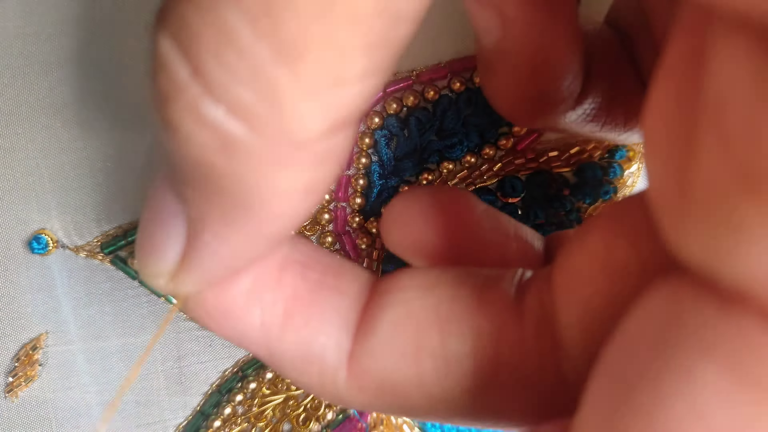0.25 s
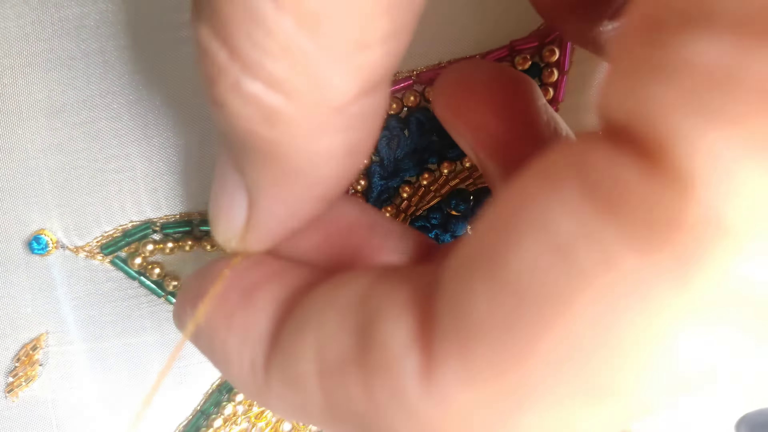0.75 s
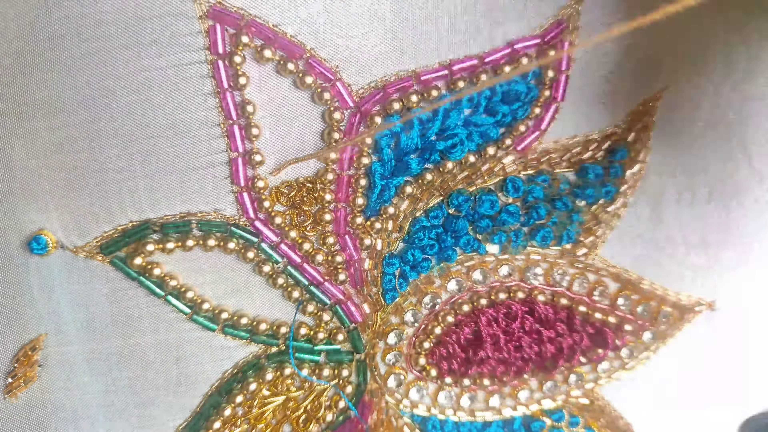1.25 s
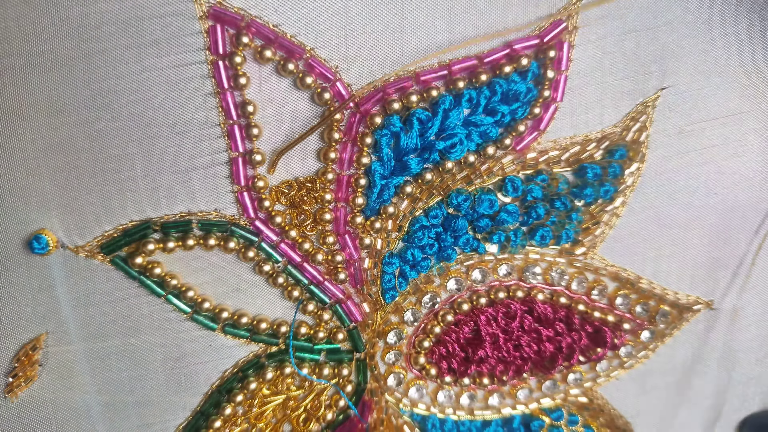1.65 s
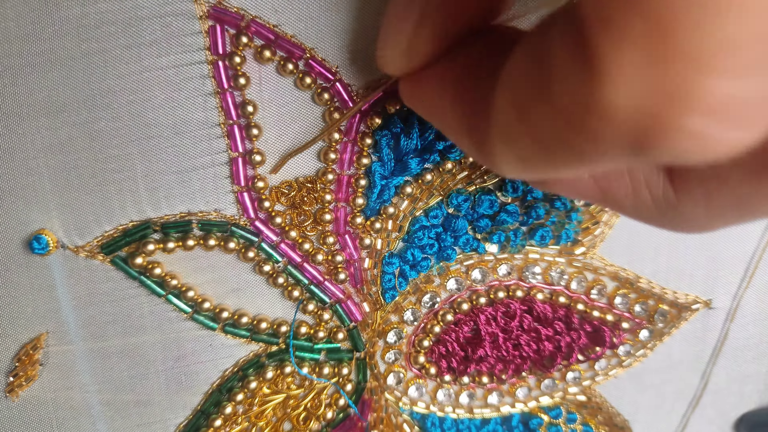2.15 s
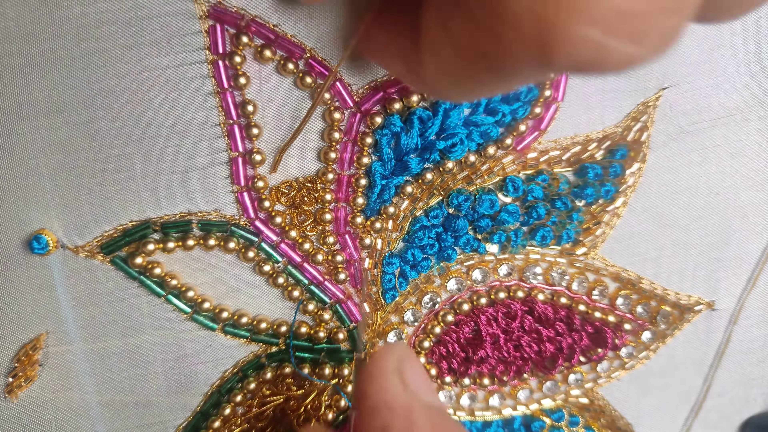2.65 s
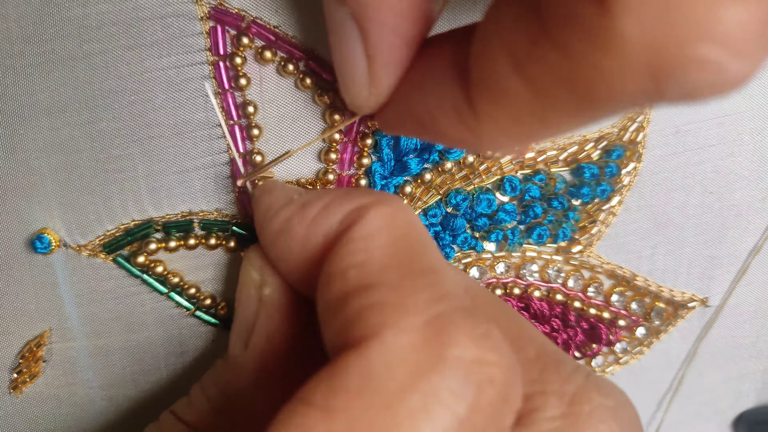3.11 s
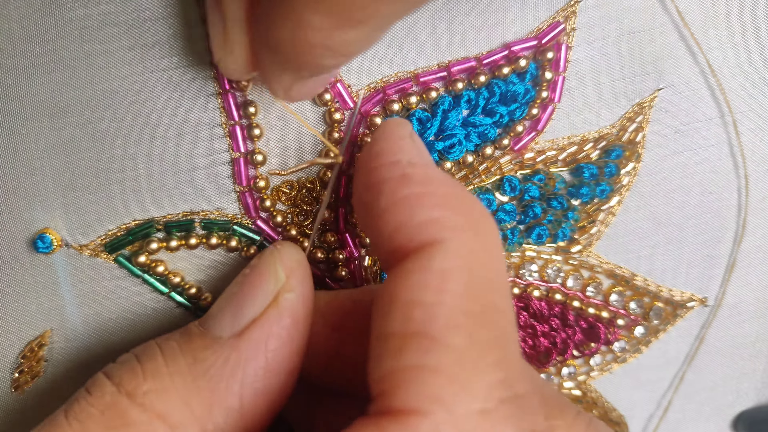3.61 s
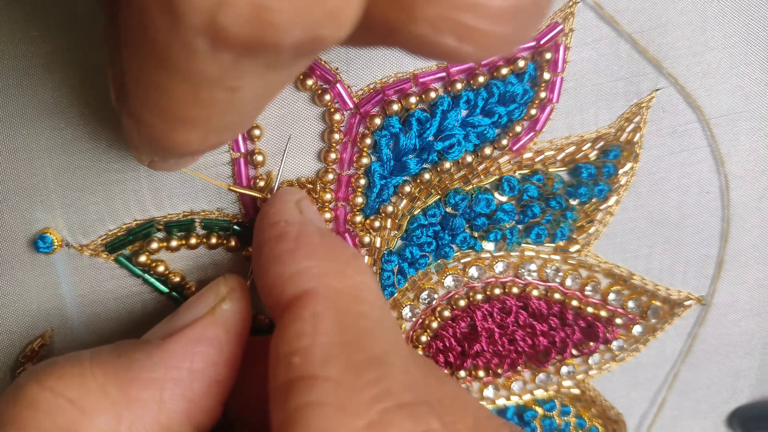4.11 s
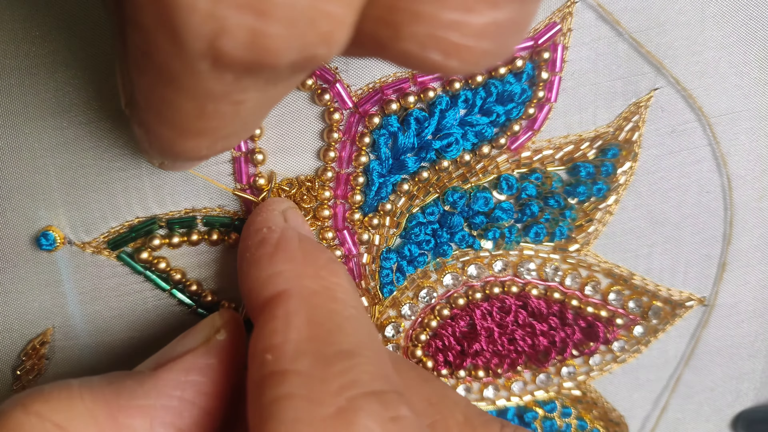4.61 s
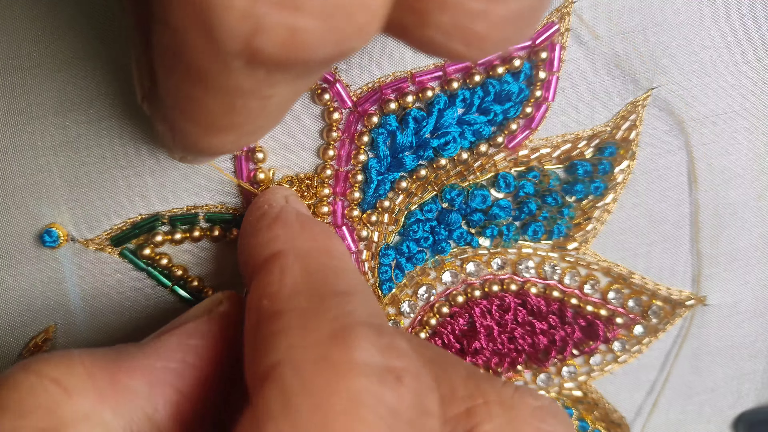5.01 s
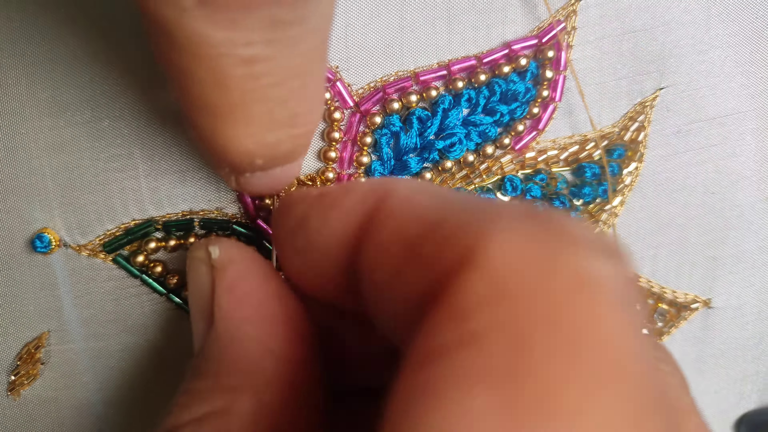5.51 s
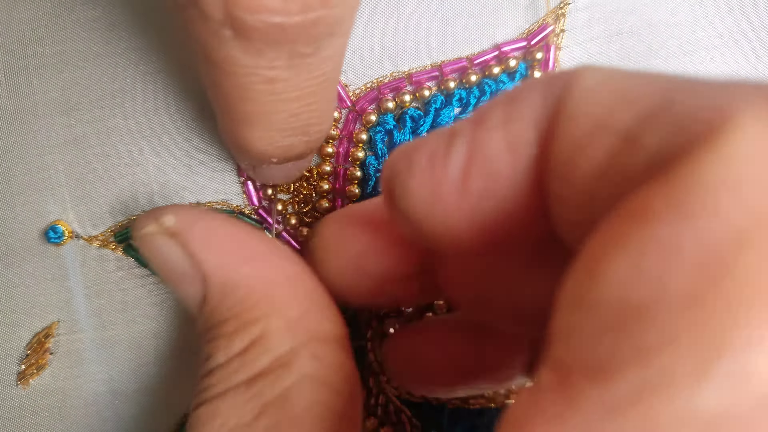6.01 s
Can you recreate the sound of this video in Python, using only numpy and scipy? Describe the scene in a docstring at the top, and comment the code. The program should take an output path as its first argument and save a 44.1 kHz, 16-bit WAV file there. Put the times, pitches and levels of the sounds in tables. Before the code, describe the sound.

A close stereo microphone picks up hand embroidery on drum-tight beaded cloth in a small quiet room, over faint steady noise and low rocking rumble. Around 0.3 to 0.6 seconds the needle makes small pops, one at 0.46 with a thin steel ring, over soft finger bumps. From 0.9 to 1.2 a thread draws through with a wavering hiss and rubbing skin. A soft bump comes near 1.5. From 1.9 to 2.3 knocks on wood and low thuds gather; the deepest thump lands at 2.6. Scrapes, short groans of cloth and clustered taps run from 2.9 to 3.3, then a sharp bright click at 3.5. A gentle push follows at 3.7. It stays calmer until tiny twanging thread jerks at 4.6 to 4.8. Bead ticks, knocks and pops cluster from 5.0 to 5.75, then a faint rub fades into the background.

```python
"""Hand embroidery: fingers bump a fabric stretched drum-tight in its frame and a needle pops through the weave.
Fabric, frame and needle ring as sums of decaying sine modes; cracks and ticks are short bursts of shaped noise.
Rubbing skin, nails and thread are trains of random catches that pass through resonances or spectra.
A cupped hand by the microphone colours the treble; a quiet small room and a steady noise lie behind."""
import sys
import numpy as np
from scipy import signal
from scipy.fft import rfft, irfft, next_fast_len
from scipy.io import wavfile
from scipy.ndimage import map_coordinates

SR = 44100
rng = np.random.default_rng(int(sys.argv[2]) if len(sys.argv) > 2 else 0)


def generate_wav(signal):
    """Clip the signal to [-1, 1] and save it as 16-bit WAV at the path in sys.argv[1]."""
    frames = np.transpose(np.atleast_2d(signal))
    scaled = np.clip(frames, -1, 1) * 32767
    pcm = np.round(scaled).astype(np.int16)
    wavfile.write(sys.argv[1], SR, pcm)


N = 275957
T = np.arange(SR // 3) / SR  # time within one event, s
PORT_SCATTER_RAD = 0.8  # spread of a mode's phase at each microphone port
KNOCK_SCATTER_DB = 3  # spread of the fabric's mode levels from knock to knock

# how hard the hands work: [t/s, effort level/dB]
EFFORT = [(0.0, -68.5), (0.59, -59.5), (0.85, -62), (1.1, -58), (1.53, -70), (1.83, -66.5), (2.13, -54.5),
          (2.58, -58.5), (2.72, -53), (3.24, -54.5), (3.61, -61), (4.22, -58), (4.39, -61.5), (5.37, -65),
          (5.59, -56.5), (5.73, -61.5), (5.82, -62), (6.26, -61.5)]
# noise spectrum of the needle's crack: [f/Hz, level/dB]
CRACK_SPECTRUM = [(500, 8.5), (1000, 4.5), (1600, 1), (2700, -1), (4000, -0.5), (5500, -54), (9000, -36)]
# noise spectrum of its brighter sparkle: [f/Hz, level/dB]
SPARKLE_SPECTRUM = [(2500, -23), (4400, -1), (6000, -5.5), (8200, 0.5), (10000, -15.5), (14000, -11)]


def amp(db):
    """Level in decibels to amplitude ratio."""
    return 10 ** (np.asarray(db) / 20)


def unit(x):
    """Normalise to an rms of 1."""
    return x / np.sqrt(np.mean(x ** 2) + 1e-20)


def crest(x):
    """Normalise a stereo event so that the mean of its sides peaks at 1."""
    return x / np.abs(x.mean(0)).max()


def along(points, hz):
    """Interpolate (f/Hz, value) points linearly on a logarithmic frequency axis."""
    f, v = np.transpose(points)
    return np.interp(np.log(hz + 1), np.log(f + 1), v)


def curves(rows):
    """Interpolate each column after the time to one value per sample."""
    s, *columns = np.transpose(rows)
    t = np.arange(N) / SR
    return [np.interp(t, s, column) for column in columns]


def wobble(rate):
    """Spline through normal random knots, rate of them a second: a smooth fluctuation."""
    knots = rng.standard_normal(int(N * rate / SR) + 4)
    return map_coordinates(knots, [np.arange(N) * rate / SR])


def filtered(x, response):
    """Linear filtering: multiply the spectrum of x by a complex response of frequency."""
    n = x.shape[-1]
    m = next_fast_len(n + 8192)
    return irfft(rfft(x, m) * response(np.fft.rfftfreq(m, 1 / SR)), m)[..., :n]


def coloured(x, spectrum):
    """Zero-phase filtering by (f/Hz, level/dB) points."""
    return filtered(x, lambda hz: amp(along(spectrum, hz)))


def through(x, response):
    """Convolution with a stereo impulse response."""
    return signal.fftconvolve(np.atleast_2d(x), response, axes=1)[:, :x.shape[-1]]


def moving_ring(x, hz, width_hz, order=5):
    """Heterodyne resonance: shift the curve hz down to zero, low-pass by cascaded poles, shift back."""
    carrier = np.exp(2j * np.pi * np.cumsum(hz) / SR)
    pole = np.exp(-2 * np.pi * width_hz / SR)
    sections = [[1 - pole, 0, 0, 1, -pole, 0]] * order
    return (carrier * signal.sosfilt(sections, x / carrier)).real


def sides(pan_db):
    """Level difference between the ports as left and right gains; positive favours the left."""
    return amp([[pan_db / 2], [-pan_db / 2]])


def add(track, s, sound):
    """Superposition: mix a sound into the track from s seconds."""
    part = track[:, round(s * SR):][:, :sound.shape[-1]]
    part += sound[..., :part.shape[1]]


def grains(rate, spread_db, apart):
    """Friction as sparse random impulses of uneven size: a common train plus one for each port."""
    size = rng.standard_normal((3, N)) * amp(spread_db * rng.standard_normal((3, N)))
    catches = (rng.random((3, N)) < rate / SR) * size
    return catches[0] + apart * catches[1:]


def burst(spectrum, t60, apart):
    """A crack: shaped noise with a fast onset and exponential decay, peak 1."""
    noise = rng.standard_normal((3, len(T)))
    envelope = amp(-60 * T / t60) * (1 - np.exp(-T / 0.0001))
    return crest(coloured((noise[0] + apart * noise[1:]) * envelope, spectrum))


def stroke(start, fastest, end):
    """Friction power rises and falls with speed, at most 1; an end before the fastest moment cuts the rise."""
    speed = np.interp(np.arange(N) / SR, [start, fastest, end], [0, 1, 0])
    return speed ** 1.92


def air(spectrum):
    """Stereo noise of rms 1 whose coherence depends on frequency and vanishes in the treble."""
    # likeness of the two sides: [f/Hz, correlation]
    likeness = [(30, 0.6), (130, 0.31), (300, 0.6), (640, 0.061), (1400, 0.00089)]

    def mid_side(hz):
        turn = np.arccos(np.clip(along(likeness, hz), -1, 1)) / 2
        return np.array([np.cos(turn), np.sin(turn)])

    noise = coloured(rng.standard_normal((2, N)), spectrum)
    mid, side = filtered(noise, mid_side)
    return unit(np.array([mid + side, mid - side]))


def background(quiet_db):
    """Steady broadband noise, stationary in level and spectrum."""
    # background spectrum: [f/Hz, level/dB]
    quiet_spectrum = [(20, -3), (45, -11.5), (95, -9), (150, -12.5), (260, -18), (575, -23), (1080, -30),
                      (2000, -32), (3740, -35.5), (7400, -42), (9700, -46), (12500, -40.5), (14400, -41)]
    return amp(quiet_db) * air(quiet_spectrum) * sides(0.052)


def room(x):
    """Reverberation: noise whose decay time depends on frequency, convolved with the sound."""
    # reverberation time: [f/Hz, t60/s]
    decay_times = [(100, 0.41), (600, 0.24), (3000, 0.2), (4400, 0.1), (7500, 0.17), (12000, 0.05)]
    hz, t, z = signal.stft(rng.standard_normal((2, SR // 2)), SR, nperseg=256)
    decay = amp(-60 * t / along(decay_times, hz)[:, None])
    tail = signal.istft(z * decay, SR, nperseg=256)[1]
    delayed = np.pad(tail, ((0, 0), (200, 0)))  # 200 samples before the near walls answer
    return through(x, delayed / np.linalg.norm(tail[0]))


def cupped_hand(x):
    """Cavity resonance: the hollow of the near hand rings, and shades the treble between its peaks."""
    # cavity resonances: [f/Hz, width/Hz, level/dB]
    hollow_modes = [(2710, 870, 5.5), (2950, 400, 16), (6020, 220, -3.5), (7900, 340, -25)]
    # the hand draws near and stays: [t/s, closeness 0-1]
    closeness_points = [(0, 0.7), (1.12, 1), (1.35, 1)]
    closeness, = curves(closeness_points)
    near = x * np.clip(closeness, 0, 1)

    def ring(f):
        total = 0
        for k, (centre, width, db) in enumerate(hollow_modes):
            resonance = 1j * f * width / (centre * centre - f * f + 1j * f * width)
            total = total + (-1) ** k * amp(db) * resonance  # neighbours alternate in sign
        return 0.32 * total

    shaded = coloured(near, [(500, 0.0), (1700, -3.5), (3600, -2.5), (5000, -5.5), (9000, -0.5)])
    return x - near + shaded + filtered(near, ring)


def sway(sway_db=3.5, drift_db=1.0):
    """Forced low-frequency motion: the frame rocks slowly, more when the hands work harder."""
    # rocking spectrum: [f/Hz, level/dB]
    sway_spectrum = [(12, -1), (22, 12), (31, 6.5), (42, -0.5), (80, -10.5), (130, -9.5), (220, -59)]
    effort_db, = curves(EFFORT)
    level = amp(effort_db + sway_db + drift_db * wobble(4.5))
    return level * air(sway_spectrum) * sides(0.93)


def wood(hz_struck):
    """Modal ring of the wooden frame; a touch favours the modes near hz_struck."""
    # frame modes: [f/Hz, level/dB, t60/s]
    wood_modes = [(1222, 2.5, 0.03), (1540, 0, 0.066), (2200, 0, 0.03), (2530, -2, 0.039),
                  (2810, -5, 0.028), (3210, -4, 0.024), (3850, 3, 0.02)]
    hz, db, t60 = np.transpose(wood_modes)[:, :, None]
    phase = PORT_SCATTER_RAD * rng.standard_normal((2, len(hz), 1))
    level_db = db - 4.7 * np.log2(hz / hz_struck) ** 2 - 60 * T / t60
    return (amp(level_db) * np.sin(2 * np.pi * hz * T + phase)).sum(1)


def frame(knock_damping_db_per_s=1500, stutter_db=3):
    """Impact and stick-slip on wood: fingers knock with extra damping, a nail stutters over the beadwork."""
    # knocks: [t/s, level/dB, most excited f/Hz]
    frame_knocks = [(1.874, -62, 1300), (2.077, -52.5, 1350), (2.2632, -51, 2000), (2.274, -48, 1350),
                    (2.62, -47, 1500), (2.872, -56, 3200), (2.886, -55, 3900), (3.076, -53, 1200),
                    (3.09, -59, 1600), (3.111, -61, 3400), (3.119, -61, 3700), (3.137, -61, 3200),
                    (5.0579, -50, 1500), (5.422, -52.5, 1890), (5.655, -54, 1100)]
    # nail scrapes: [start t/s, fastest t/s, end t/s, level/dB, most excited f/Hz]
    nail_scrapes = [(1.07, 1.137, 1.15, -69, 1200), (1.872, 1.96, 2, -74, 1590),
                    (2.87, 2.88, 2.93, -64, 3700), (3.023, 3.066, 3.3, -72, 1300),
                    (5.063, 5.085, 5.17, -73, 1700)]
    out = np.zeros((2, N))
    for s, db, hz in frame_knocks:
        add(out, s, amp(db) * crest(wood(hz) * amp(-knock_damping_db_per_s * T)))
    for *times, db, hz in nail_scrapes:
        catches = grains(rate=600, spread_db=3, apart=0.7) * amp(stutter_db * wobble(70))
        out += amp(db) * np.sqrt(stroke(*times)) * unit(through(catches, wood(hz)))
    return out * sides(3.5)


def long_draw(level_db=-77.5, waver=0.014, grip_db=1.3):
    """Friction-driven resonance: thread runs through the weave, its hiss wavering as it grips and slides."""
    # resonances that drift as the thread lengthens; width is the half-width of each cascaded pole:
    # [first f/Hz, last f/Hz, width/Hz, first level/dB, last level/dB]
    thread_modes = [(2940, 2760, 420, 2.5, 1), (3900, 3700, 270, -15, -17), (6230, 5670, 560, -9, -5),
                    (7150, 6900, 800, -24, -8)]
    start_s, end_s, attack_s, release_s = 0.866, 1.22, 0.03, 0.022
    t = np.arange(N) / SR
    speed = np.clip(np.minimum((t - start_s) / attack_s, (end_s - t) / release_s), 0, 1)

    def glide(first, last):
        return np.interp(t, [start_s, end_s], [first, last])

    tension = 1 + waver * wobble(24.8)
    catches = grains(rate=700, spread_db=3, apart=0.92)
    hiss = np.zeros((2, N))
    for first_hz, last_hz, width_hz, first_db, last_db in thread_modes:
        gain = amp(glide(first_db, last_db) + grip_db * wobble(60.1))
        hiss += gain * unit(moving_ring(catches, tension * glide(first_hz, last_hz), width_hz))
    return amp(level_db) * speed * hiss * sides(9.8)


def slips(tick_hz=5300, twang_t60=0.015):
    """Stick-slip: each jerk of the snugged thread gives a narrow tick, then a short twang."""
    # jerks: [t/s, twang level/dB, twang f/Hz, tick level/dB]
    jerks = [(4.638, -47, 408, -56), (4.684, -49.5, 450, -54.5), (4.698, -50.5, 387, -62),
             (4.740, -53.5, 424, -59.5), (4.779, -58.5, 500, -68)]
    out = np.zeros((2, N))
    for s, twang_db, hz, tick_db in jerks:
        envelope = amp(-60 * T / twang_t60) * (1 - np.exp(-T / 0.002)) ** 2
        twang = np.sin(2 * np.pi * hz * T) * envelope
        add(out, s + 0.0014, amp(twang_db) * crest(twang * sides(9.1)))
        tick = burst([(2600, -30), (tick_hz, 0), (7400, -30)], t60=0.0084, apart=0.92)
        add(out, s, amp(tick_db) * tick)
    return out


def friction():
    """Powers of independent sources add: holding fingers, rubs and thread pulls set four friction levels."""
    # fingers that only hold, over the effort: [shudder, drag, scrape, hiss level/dB]
    resting_db = (-2.5, -15, -29.5, -31)
    # rubs over the work: [start t/s, fastest t/s, end t/s, drag level/dB, share over beads 0-1]
    rubs = [(0.21, 0.242, 0.28, -64.5, 0.23), (0.473, 0.493, 0.64, -69, 0.3),
            (0.583, 0.595, 0.61, -60, 0.3), (0.735, 0.751, 0.91, -64, 0.04),
            (0.828, 0.95, 2.8, -64.5, 0.07), (1.073, 1.135, 1.225, -56, 0.15),
            (1.458, 1.506, 1.54, -61.5, 0.65), (1.879, 1.98, 2.07, -63.5, 0.37),
            (2.14, 2.258, 2.16, -54.5, 0), (2.598, 2.615, 2.485, -59, 0.35),
            (2.859, 2.904, 2.95, -62.5, 0.2), (3.015, 3.086, 3.32, -59.5, 0.13),
            (3.647, 3.898, 3.87, -66, 0.33), (3.96, 4.017, 4.16, -65.5, 0.17),
            (5.025, 5.047, 5.44, -67.5, 0.25), (5.234, 5.265, 5.56, -69.5, 0.3),
            (5.888, 5.985, 6.25, -72.5, 0.45)]
    # short tugs of thread: [start t/s, fastest t/s, end t/s, hiss level/dB]
    thread_pulls = [(0.742, 0.75, 0.79, -67.5), (0.863, 0.897, 1.07, -72), (1.047, 1.107, 1.3, -67),
                    (2.511, 2.522, 2.56, -66.5), (3.09, 3.22, 3.29, -71)]
    shudder_db, scrape_db, rasp_db = 6, 4.5, 0.5  # over the drag
    effort_db, = curves(EFFORT)
    power = amp(np.add.outer(resting_db, effort_db)) ** 2
    for *times, db, on_beads in rubs:
        balance = np.array([amp(shudder_db), 1, on_beads * amp(scrape_db), on_beads * amp(rasp_db)])
        power += np.outer((amp(db) * balance) ** 2, stroke(*times))
    for *times, db in thread_pulls:
        power[-1] += amp(db) ** 2 * stroke(*times)
    return np.sqrt(power)


def rubbing(scatter_db=1.5):
    """Friction excitation: skin drags on the taut cloth, scrapes over beads, and thread rasps in the weave."""
    # the fabric under a sliding finger: [f/Hz, level/dB]
    shudder_spectrum = [(50, -1.5), (85, 1), (130, -6), (200, -6), (280, -3.5), (600, -11)]
    # skin on the cloth: [f/Hz, level/dB]
    drag_spectrum = [(100, -33.5), (250, -3.5), (450, 1), (620, 3.5), (850, -1.5), (1300, -2)]
    # scrape on beads: [f/Hz, level/dB]
    scrape_spectrum = [(400, -23), (900, 2), (1500, 1), (2100, -1), (2900, -9), (4100, -7.5), (6000, -41)]
    # hiss of thread: [f/Hz, level/dB]
    thread_spectrum = [(1500, -14), (2300, 8.5), (2750, 8.5), (3500, 4.5), (4500, 5), (6000, 5),
                       (8000, 6.5), (10000, -5), (14000, -8)]
    shudder, drag, scrape, hiss = friction()
    body = through(grains(rate=450, spread_db=2.0, apart=0.37), fabric(damping=0.99, scatter_db=scatter_db))
    body = unit(coloured(body, shudder_spectrum))
    cloth = through(grains(rate=1300, spread_db=1.5, apart=0.66), fabric(damping=1.28, scatter_db=scatter_db))
    cloth = unit(coloured(cloth, drag_spectrum))
    beads = unit(coloured(grains(rate=900, spread_db=4, apart=0.9), scrape_spectrum))
    fibres = unit(coloured(grains(rate=2500, spread_db=3, apart=1.6), thread_spectrum))
    grip = amp(2.05 * wobble(50))  # the skin sticks and slides
    skin = grip * (drag * cloth + scrape * beads * sides(4.1))
    return shudder * body + skin + hiss * fibres * sides(4.6)


def groans(width_hz=130):
    """Stick-slip resonance: catches under a dragging fingertip ring the patch of cloth that it stretches."""
    # groans: [start t/s, fastest t/s, end t/s, level/dB, f/Hz]
    patch_groans = [(0.232, .265, 0.26, -61.5, 616), (1.043, 1.137, 1.28, -62, 574),
                    (1.1, 1.174, 1.17, -70, 970), (2.042, 2.062, 2.12, -64.5, 520),
                    (2.72, 2.765, 2.8, -63, 430), (2.882, 2.912, 2.945, -54.5, 520),
                    (3.04, 3.073, 2.9, -57.5, 1070), (5.257, 5.28, 5.38, -60, 395)]
    out = np.zeros((2, N))
    for *times, db, hz in patch_groans:
        catches = grains(rate=500, spread_db=2, apart=0.5)
        patch = unit(moving_ring(catches, np.full(N, hz), width_hz, order=3))
        out += amp(db) * np.sqrt(stroke(*times)) * patch
    return out * sides(2.5)


def bead_ticks(crack_db=-1, sparkle_db=-1, knock_db=-6, ping_t60=0.0091):
    """Hard impact: steel on a bead ticks brightly, pings the bead and barely moves the fabric."""
    # ticks: [t/s, level/dB, ping level/dB, ping f/Hz]
    tick_events = [(0.759, -60, -56, 7800), (1.454, -66, -63, 4600), (3.074, -64, -59, 6480),
                   (3.4922, -43.5, -45, 4160), (3.824, -54.5, -60, 5770), (4.952, -60, -57.5, 5630),
                   (5.0572, -48, -67, 6240), (5.082, -62, -66, 5500), (5.1848, -59, -54.5, 4900),
                   (5.243, -53, -50, 5900), (5.3318, -63, -62, 5315), (5.381, -55, -62, 5900),
                   (5.401, -57.5, -68, 6010)]
    out = np.zeros((2, N))
    for s, db, ping_db, ping_hz in tick_events:
        crack = amp(crack_db) * burst(CRACK_SPECTRUM, t60=0.0031, apart=1.0)
        sparkle = amp(sparkle_db) * burst(SPARKLE_SPECTRUM, t60=0.03, apart=0.71)
        ring = fabric(damping=1.1, scatter_db=KNOCK_SCATTER_DB, hz_struck=660)
        knock = amp(knock_db) * crest(ring)
        ping = burst([(ping_hz / 2, -30), (ping_hz, 0), (ping_hz * 2, -40)], t60=ping_t60, apart=0.74)
        add(out, s, amp(db) * ((crack + sparkle) * sides(2.1) + knock) + amp(ping_db) * ping)
    return out


def needle(pivot_hz=3000):
    """Free vibration of the steel needle, flicked as it springs through and damped by the holding fingers."""
    # needle modes: [f/Hz, level/dB, t60/s]
    needle_modes = [(2717, -4, 0.027), (2840, -13, 0.078), (3230, -2.5, 0.014), (4230, -27, 0.018),
                    (4345, 1.5, 0.014), (6500, -12.5, 0.013), (6900, -12, 0.014), (7460, -2.5, 0.01),
                    (8200, -13, 0.013), (8500, -33, 0.01)]
    # flicks: [t/s, level/dB, brightness/dB per octave about the pivot]
    flick_events = [(0.439, -67, -2), (0.4627, -44.5, 1.5), (0.577, -56, -18), (.591, -60, -22),
                    (3.493, -54.5, 5)]
    out = np.zeros((2, N))
    for s, db, tilt_db in flick_events:
        for hz, level_db, t60 in needle_modes:
            phase = PORT_SCATTER_RAD * rng.standard_normal((2, 1))  # each port meets the wave at its own phase
            mode_db = db + level_db + tilt_db * np.log2(hz / pivot_hz)
            add(out, s, amp(mode_db - 60 * T / t60) * np.sin(2 * np.pi * hz * T + phase))
    return out


def fabric(damping, scatter_db, hz_struck=0):
    """Modal ring of a taut membrane, scattered anew each touch; a sharp touch favours modes near hz_struck."""
    # fabric modes, before scatter and damping: [f/Hz, level/dB, t60/s, left-right level/dB]
    fabric_modes = [(57, -13, 0.24, 4), (81, -4, 0.18, -2), (98.3, 1.5, 0.18, 2.5), (132.2, -2, 0.14, -15),
                    (168.2, -1.5, 0.15, -5.5), (191, -4, 0.11, -0.5), (261, -10, 0.12, 5.5),
                    (307, -17.5, 0.088, 13), (379.9, -11.5, .13, 4.5), (433.7, -18, 0.12, 4),
                    (512, -15, 0.072, 0), (578.6, -13.5, 0.053, 1), (660, -16, 0.028, 9),
                    (816, -13.5, 0.027, 16.5), (963, -20, 0.076, -3.5), (1340, -12.5, 0.015, 11.5)]
    hz, db, t60, pan_db = np.transpose(fabric_modes)
    luck = rng.standard_normal((3, len(hz)))
    if hz_struck:
        db = db - 11 * np.log2(hz / hz_struck) ** 2
    mode_hz = hz * (1 + 0.031 * luck[2])
    decay = amp(-60 * damping * T / t60[:, None])
    modes = np.sin(2 * np.pi * mode_hz[:, None] * T) * decay
    port_db = np.outer([0.5, -0.5], pan_db + scatter_db * luck[1])
    return amp(db + scatter_db * luck[0] + port_db) @ modes


def thump(hz, slap_db=-12.5, slap_hz=227):
    """Forced response: fabric is slapped, loaded and swings back, duller for slower contact. Peak 1."""
    u = 2 * np.pi * hz * T
    force = u * np.sin(u) * np.exp(-0.6 * u)
    slap = crest(fabric(damping=1.6, scatter_db=5.5, hz_struck=slap_hz))  # the skin's first touch
    swing = crest(through(force, fabric(damping=1.18, scatter_db=2.5)))
    return crest(swing + amp(slap_db) * slap)


def nudges(per_s=4.4, over_effort_db=11, spread_db=-5, contact_hz=97):
    """Random light impacts: shifting fingers nudge the fabric, harder when the hands are busy."""
    out = np.zeros((2, N))
    effort_db, = curves(EFFORT)
    for k, (late, size, speed) in enumerate(rng.uniform(-1, 1, (64, 3))):
        s = (k + 0.5 + late / 2) / per_s
        if s * SR < N - 1:
            db = effort_db[int(s * SR)] + over_effort_db + spread_db * size
            add(out, s, amp(db) * thump(contact_hz * (1 + 0.27 * speed)))
    return out


def pushes():
    """Soft impact: fingertips press on the fabric and excite its low modes."""
    # pushes: [t/s, peak level/dB, contact speed f/Hz]
    fingertip_pushes = [(0.436, -39, 70.6), (0.482, -35, 64.6), (0.504, -37.5, 48.3), (0.758, -44, 122),
                        (1.118, -43.5, 121), (1.469, -40.5, 59.4), (1.527, -42.5, 61.7), (1.974, -34, 89),
                        (2.238, -30.5, 66), (2.269, -33.5, 62), (2.317, -38.5, 98.4), (2.615, -23, 69.3),
                        (2.664, -33.5, 55.5), (3.089, -31.5, 117), (3.109, -31.5, 114), (3.135, -31, 134),
                        (3.691, -38.5, 74), (4.047, -46, 109), (4.137, -39.5, 75), (5.06, -45, 110),
                        (5.42, -39, 100)]
    out = np.zeros((2, N))
    for s, db, hz in fingertip_pushes:
        add(out, s, amp(db) * thump(hz))
    return out


def spot(hz, level_db=-1.5, t60=0.026):
    """A single damped mode: the small taut patch of cloth between the fingers pops at one pitch."""
    envelope = amp(level_db - 60 * T / t60) * (1 - np.exp(-T / 0.00054))
    return np.sin(2 * np.pi * hz * T) * envelope * sides(3.6)


def settling(t60=0.12, catches_per_s=810):
    """Relaxation: fibres and beads settle as sparse catches that die away exponentially."""
    # rustle spectrum: [f/Hz, level/dB]
    settle_spectrum = [(250, -7), (600, 4.5), (1400, -1), (2300, -3.5), (3600, -3), (9000, -15.5)]
    catches = (rng.random(len(T)) < catches_per_s / SR) * rng.standard_normal((2, len(T)))
    return unit(coloured(catches, settle_spectrum)) * amp(-60 * T / t60)


def clicks():
    """Impact hardness sets bandwidth: the needle kicks the fabric's upper modes and pops the spot it meets."""
    # contacts; the knock is a mix of fabric ring and pure spot: [t/s, knock level/dB, knock f/Hz,
    # hardness 0-1, how far the fabric gives 0-1, how purely the spot rings 0-1]
    needle_contacts = [(0.266, -42.5, 450, .1, 0.12, 0.33), (0.2856, -47, 600, 0.78, 0.47, 0.3),
                       (0.4618, -32.5, 483, 0.61, 0.68, 0.3), (0.577, -41.5, 388, 0.55, 0.8, 0.34),
                       (0.5904, -45, 430, 0.5, 0.6, 0), (0.62, -46, 443, 0.7, 0.25, 0.2),
                       (1.469, -50.5, 373, 0.56, 0.7, 0.07), (1.873, -49.5, 990, 0, 0.57, 0.34),
                       (2.0132, -41, 507, 0, 0.53, 0.3), (2.24, -42.5, 330, 0, 0, .1),
                       (2.262, -37.5, 374, 0.45, 0.04, 0.13), (2.274, -38, 480, 0.66, 0.77, 0.4),
                       (2.6151, -51, 454, 0.84, 0.3, 0.3), (2.6246, -41, 385, 0.62, 0, 0.3),
                       (2.767, -43, 480, 0.1, 0.9, 0.15), (2.8711, -41.5, 530, 0.77, 0.59, 0.1),
                       (2.918, -48.5, 560, 0.72, .1, 0.2), (2.989, -47, 590, 0.64, 0.33, 0.16),
                       (3.075, -43.5, 730, 0.47, 0.2, 0.24), (3.09, -42.5, 360, .5, 0, 0),
                       (3.111, -44, 310, .5, 0, .1), (3.138, -47, 310, .4, 0, 0.1),
                       (3.254, -48.5, 580, 0.65, 0.14, .3), (3.281, -36, 346, 0.4, 0.68, 0.28),
                       (3.31, -45, 258, .1, .4, 0.25), (3.4936, -30, 683, 0.71, 0.35, 0.35),
                       (4.9521, -44, 610, 0.81, 1, 0.25), (5.0585, -49.5, 560, 0.2, .4, 0),
                       (5.243, -40.5, 736, 0.63, 0.02, 0.57), (5.2599, -41, 530, 0.75, 0, 0),
                       (5.289, -43, 460, 0.54, 0.33, 0.87), (5.619, -45.5, 925, 0.36, 0.5, 0.2),
                       (5.6535, -39.5, 907, 0, 0.19, 0.23), (5.7098, -47.5, 614.3, 0.84, 0.97, .1),
                       (5.738, -36, 558, 0.61, 0.65, 0.43)]
    crack_db, crack_softens_db = -1, 28.5  # hardest contact over its knock; loss at the softest
    sparkle_db, sparkle_softens_db = -0.5, 49  # the same for the sparkle
    give_db, give_hz = 7.5, 122  # thump of fabric that gives fully, over the knock; its contact speed
    settle_db = -25  # rustle after the hardest pop, over its knock
    ticks, knocks = np.zeros((2, 2, N))
    for s, db, hz, hardness, give, purity in needle_contacts:
        softness = 1 - hardness
        crack = burst(CRACK_SPECTRUM, t60=0.018, apart=1.0)
        add(ticks, s, amp(db + crack_db - crack_softens_db * softness) * crack)
        sparkle = burst(SPARKLE_SPECTRUM, t60=0.016, apart=1.0)
        add(ticks, s, amp(db + sparkle_db - sparkle_softens_db * softness) * sparkle)
        ring = crest(fabric(damping=0.94, scatter_db=KNOCK_SCATTER_DB, hz_struck=hz))
        add(knocks, s + 0.00067, amp(db) * ((1 - purity) * ring + purity * spot(hz)))
        add(knocks, s, amp(db + give_db) * give * thump(give_hz))
        add(ticks, s, amp(db + settle_db) * hardness * settling())
    return ticks * sides(5.0) + knocks


def scene(room_db=-13, quiet_db=-64):
    """Superposition of the work on the frame, its reverberation and the steady background."""
    by_hand = cupped_hand(clicks() + bead_ticks() + slips() + rubbing() + groans())
    work = pushes() + nudges() + frame() + by_hand
    lead_s = np.array([[1], [-1]]) * 0.00009  # the left port hears it first
    work = filtered(work, lambda hz: np.exp(2j * np.pi * hz * lead_s))
    work = work + needle() + long_draw()  # needle ring and thread hiss reach both ports without the lead
    return work + sway() + amp(room_db) * room(work) + background(quiet_db)


def record(dry, top_hz=14480):
    """Band limitation: an ideal low-pass keeps nothing from top_hz upwards."""
    return filtered(dry, lambda hz: hz < top_hz)


dry = scene()
out = record(dry)
generate_wav(out)
```